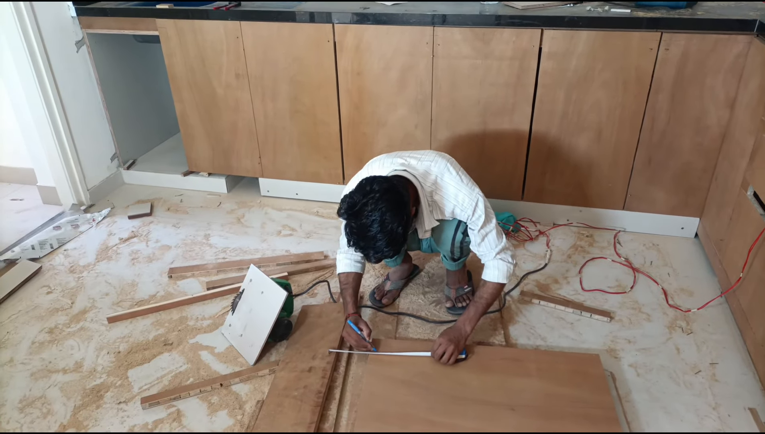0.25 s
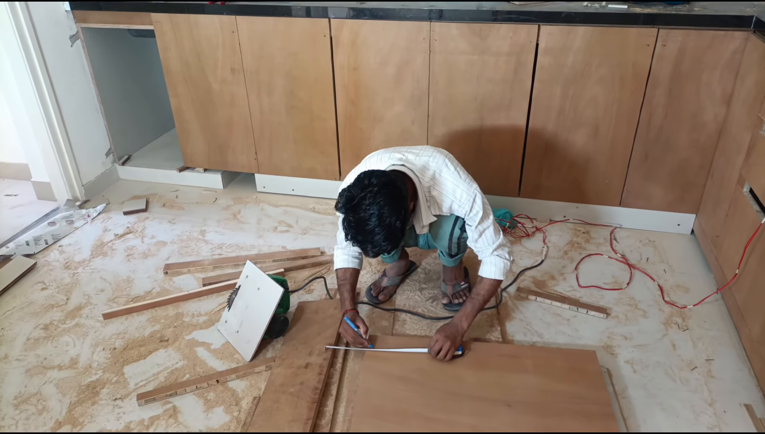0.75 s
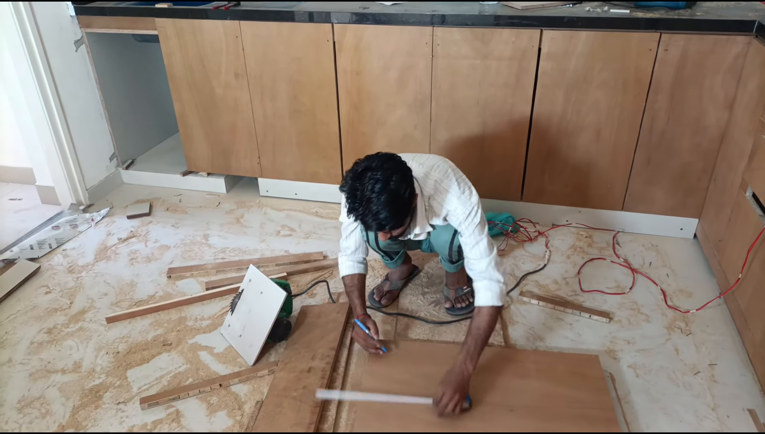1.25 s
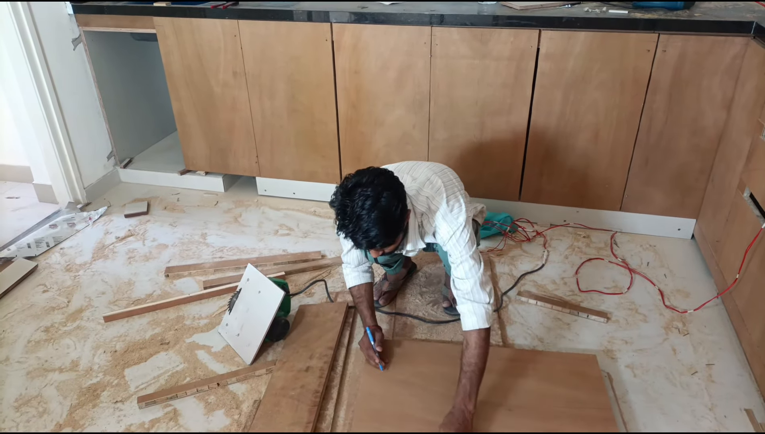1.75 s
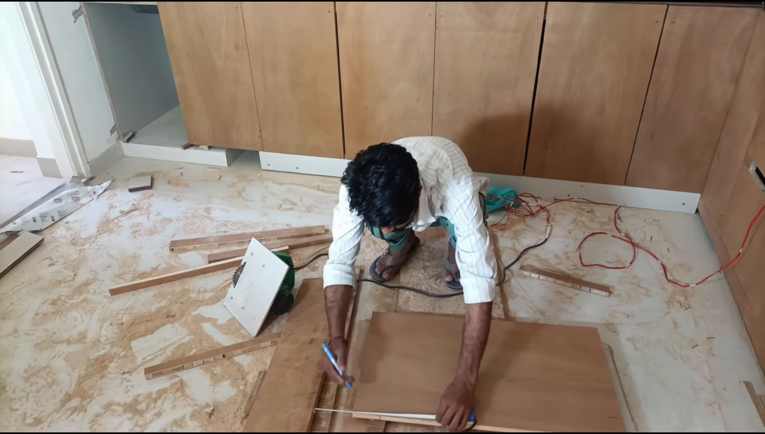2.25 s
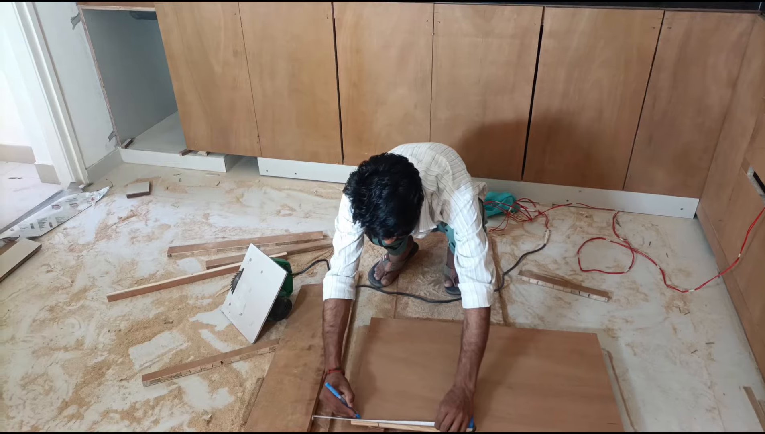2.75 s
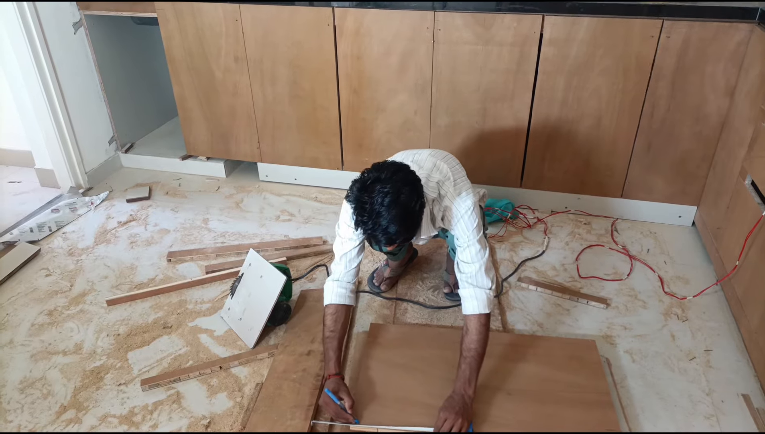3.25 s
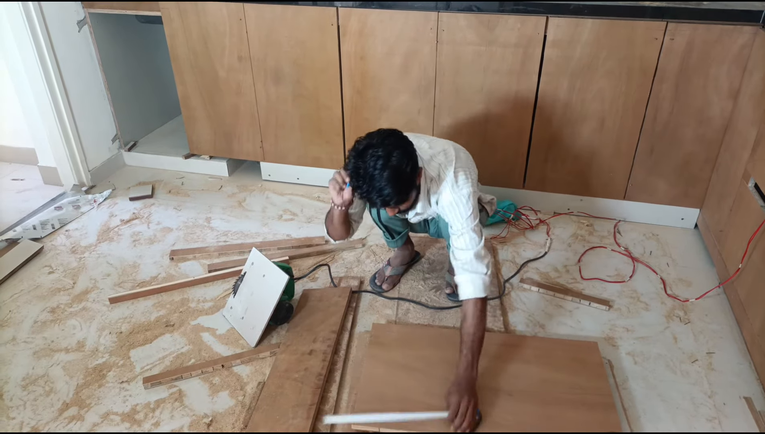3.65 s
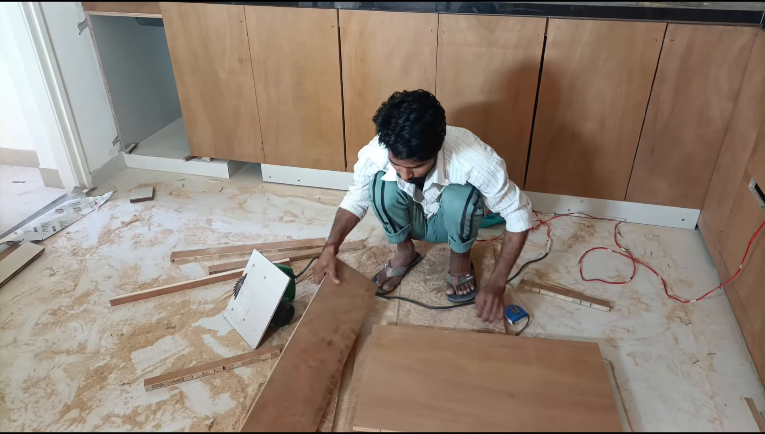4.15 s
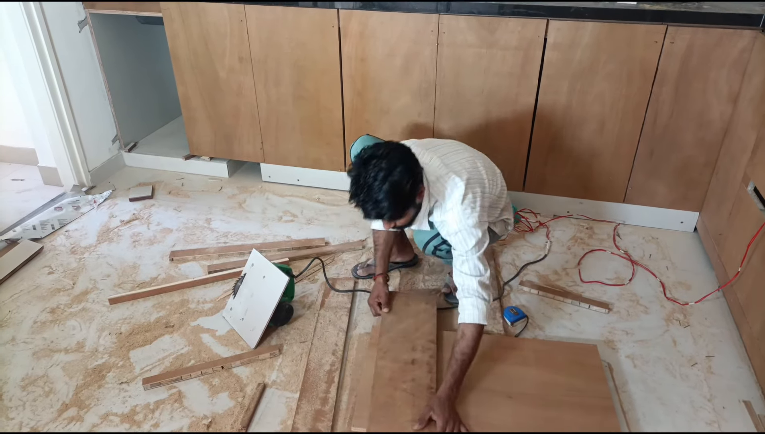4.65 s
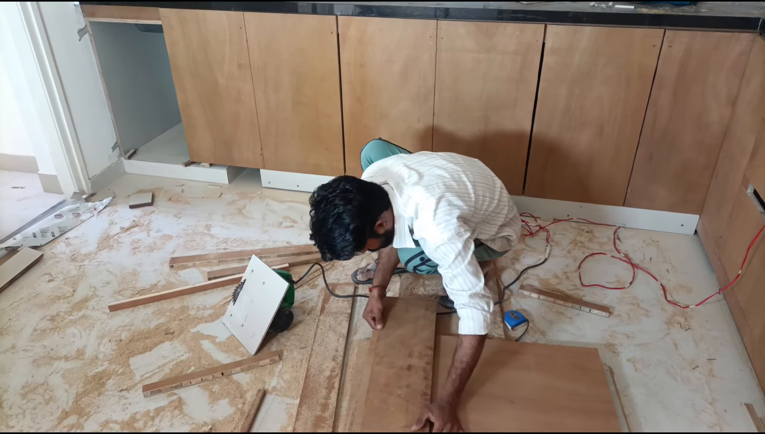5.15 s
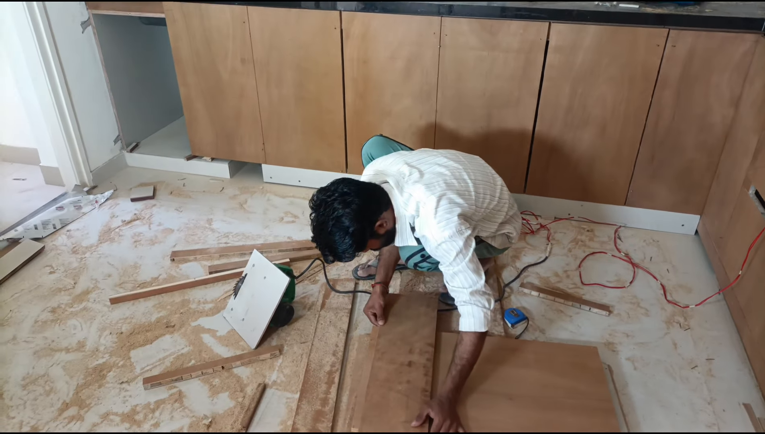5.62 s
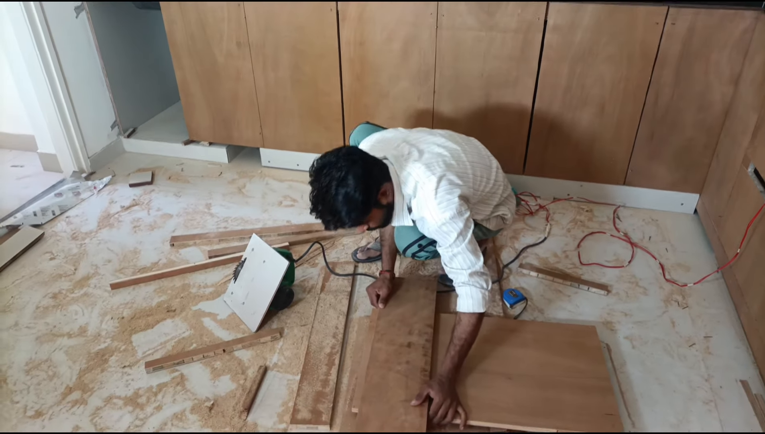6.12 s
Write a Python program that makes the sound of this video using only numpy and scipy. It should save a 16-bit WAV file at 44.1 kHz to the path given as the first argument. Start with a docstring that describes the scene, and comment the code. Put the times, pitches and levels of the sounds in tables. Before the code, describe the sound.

Quiet room air and a far tool's thin hissing whine sit beneath close carpentry sounds. Small metallic ticks lead to a bright tape-blade slap on board, then a near-quiet pause with faint pen scratches. The tape snaps home with a grainy zip, its case clacks down, and a tipped plank slaps and rattles flat, the loudest event. Dull hand knocks follow in the reverberant kitchen, heard in stereo.

```python
"""Steel tape ticks, slides and slaps on plywood in a bare, echoing kitchen, over a power tool's far, faint whine.
A carpenter is marking the sheet; the tape runs back into its case, which he sets down, and a tipped plank
clatters flat. Blows are flurries of tiny impacts filtered by each object's spectrum, plus decaying ringing modes.
Tape slides, plank scrapes and pen strokes are clumped grains of noise that follow the speed of the movement.
The far tool is hiss with wandering whistles; weight shifts and the still air of the room are shaped noise."""
import sys
import numpy as np
from scipy import signal
from scipy.fft import rfft, irfft, next_fast_len
from scipy.io import wavfile
from scipy.ndimage import uniform_filter1d

SR = 44100
rng = np.random.default_rng(int(sys.argv[2]) if len(sys.argv) > 2 else 0)


def int16_out(signal):
    """Quantize to a 16-bit WAV file."""
    q = np.round(np.clip(np.atleast_2d(signal).T, -1, 1) * 32767)
    wavfile.write(sys.argv[1], SR, q.astype(np.int16))


N = 281354  # samples

MIC_GAP = 0.13  # m
SOUND_SPEED = 343  # m/s

# modes of the tape case: f/Hz, level/dB, t60/s
CASE_MODES = [(527.6, -1, 0.33), (2197, -1.5, .3), (2310, -0.5, .3), (2650, -5.5, 0.1916)]
# modes of the plank: f/Hz, level/dB, t60/s
PLANK_MODES = [(286, -30, .4), (346, 6, 0.76), (390.7, -6, 0.76), (405, 7, 0.24), (492, 2, 0.61),
               (807, -5.5, 0.73), (1008, -7.5, 0.74), (1013, -10, .3), (1240, -12.5, 0.46),
               (1140, -18, .35)]
# spectrum of a slide or scrape on the sheet and floor: f/Hz, level/dB
SLIDE_SPECTRUM = [(100, -19.5), (280, -21.5), (440, 0), (700, -18), (1150, -4), (1800, -4.5), (2450, 3.5),
                  (3300, -1.5), (4700, -2.5), (6400, 3.5), (8000, -8.5), (11000, -3.5), (15000, -7)]
# spectrum of the blade rushing into its case: f/Hz, level/dB
SNAP_SPECTRUM = [(100, -26), (500, -25.5), (700, -23.5), (1200, -19.5), (1850, -18), (2350, 4),
                 (3100, -1.5), (4000, -8), (6300, -6.5), (8000, -15.5), (11000, -10.5), (15000, -12)]


def amp(db):
    """Decibels to gain."""
    return 10 ** (np.asarray(db) / 20)


def unit(x):
    """Scales to rms 1."""
    return x / np.sqrt(np.mean(x ** 2) + 1e-20)


def read(points, hz):
    """Reads a table on a log-frequency axis."""
    f, value = np.transpose(points)
    return np.interp(np.log(hz + 1), np.log(f + 1), value)


def add(mix, s, sound):
    """Lays a stereo sound into the mix at time s."""
    start = max(round(s * SR), 0)
    part = mix[:, start:][:, :sound.shape[1]]
    part += sound[:, :part.shape[1]]


def shelves(hz, bass_db, treble_db):
    """Soft contacts give more bass, hard steel edges more treble: dB at each frequency."""
    bass = bass_db / (1 + (hz / 1200) ** 3)
    treble = treble_db * (1 - 1 / (1 + (hz / 4500) ** 4))
    return bass + treble


def colour(x, spectrum, bass_db=0, treble_db=0, size=2048):
    """Causal filter of unit energy with the given spectrum."""
    hz = abs(np.fft.fftfreq(size, 1 / SR))
    log_gain = np.log(amp(read(spectrum, hz) + shelves(hz, bass_db, treble_db)))
    minimum_phase = np.exp(np.conj(signal.hilbert(log_gain)))
    taps = np.fft.ifft(minimum_phase).real
    return signal.fftconvolve(x, taps / np.linalg.norm(taps))


def diffuse(count):
    """Noise from all directions at two microphones: alike in the bass, unrelated in the treble."""
    size = next_fast_len(count)
    a, b = rfft(rng.standard_normal((2, size)))
    same = np.sinc(2 * np.fft.rfftfreq(size, 1 / SR) * MIC_GAP / SOUND_SPEED) * 0.94
    return irfft([a, same * a + np.sqrt(1 - same ** 2) * b], size)[:, :count]


def shape(x, gain_db):
    """Filters both channels by a function that gives dB at each frequency."""
    size = next_fast_len(x.shape[1] + 2048)
    gain = amp(gain_db(np.fft.rfftfreq(size, 1 / SR)))
    return irfft(rfft(x, size) * gain, size)[:, :x.shape[1]]


def room(x, wet_db, early_db=-4, early_s=0.024, build_s=0.00076, count=36000):
    """Direct sound, first bounces off floor and cabinets, and the tail of hard walls, drawn anew each call."""
    # decay of the kitchen: f/Hz, t60/s
    decay = [(100, 0.6), (400, 0.61), (1000, .58), (2500, 0.46), (6000, 0.49), (10000, 0.35), (15000, 0.33)]
    hz, t, z = signal.stft(diffuse(count), SR, nperseg=256)
    z = z * 10 ** (-3 * t / read(decay, hz)[:, None])
    tail = signal.istft(z * (1 - np.exp(-t / build_s)), SR)[1]
    response = amp(wet_db) * tail / np.linalg.norm(tail[0])
    response[:, 0] += 1  # direct sound
    delays_s = np.geomspace(0.001, early_s, 8) * rng.uniform(0.8, 1.2, 8)
    lags_s = MIC_GAP / SOUND_SPEED * rng.uniform(-0.5, 0.5, len(delays_s))
    signs = rng.choice([-1, 1], len(delays_s))
    for delay_s, lag_s, sign in zip(delays_s, lags_s, signs):
        at = np.round((delay_s + np.array([lag_s, -lag_s])) * SR).astype(int)
        response[[0, 1], at] += sign * amp(early_db) / np.sqrt(len(delays_s))
    return signal.fftconvolve(x[None], response, axes=1)


def chatter(length_s, size=4096):
    """A contact of unit energy: a flurry of tiny impacts that swells and dies, with an even spectrum."""
    u = np.arange(size) / SR / max(length_s, 0.0014)  # no contact is shorter than 1.4 ms
    fade = u * np.exp(-u)
    z = rfft(rng.standard_normal(size) * fade)
    force = irfft(z / (abs(z) + 1e-9)) * np.sqrt(fade)
    return force / np.linalg.norm(force)


def resonant(spectrum, modes, peak_db, width_hz):
    """Raises a spectrum at each mode, so that the crack itself rings for a few milliseconds."""
    hz = np.fft.rfftfreq(2048, 1 / SR)
    nearness = 1 / (1 + ((hz - np.array(modes)[:, :1]) / width_hz) ** 2)
    return np.column_stack([hz, read(spectrum, hz) + peak_db * nearness.max(0)])


def contacts(hits, contact_s, bass_db, soft_bass, thinning, doubling_db=30):
    """Gentler blows last longer and carry more bass; brightness takes bass away by the share thinning."""
    s, db, bright_db = np.transpose(hits)
    softer_db = db.max() - db
    length_s = contact_s * 2 ** (softer_db / doubling_db)
    bass = bass_db + soft_bass * softer_db - thinning * bright_db  # negative thinning adds bass
    return np.column_stack([s, db, length_s, bass, bright_db])


def blows(hits, spectrum, modes, ring_db, wet_db):
    """Each blow cracks into the room and leaves the object's modes ringing."""
    out, t = np.zeros((2, N)), np.arange(SR) / SR
    hz, mode_db, t60 = np.transpose(modes)[:, :, None]
    lag_s = MIC_GAP / SOUND_SPEED * rng.uniform(-1, 1, hz.shape)
    fade = 10 ** (-3 * t / t60) * (1 - np.exp(-t / 0.002))
    # each mode arrives from its own side
    rings = fade * np.sin(2 * np.pi * hz * np.array([t + 0 * lag_s, t + lag_s]))
    for s, db, length_s, bass_db, treble_db in hits:
        crack = colour(chatter(length_s), spectrum, bass_db, treble_db)
        crack = crack * np.sqrt(0.005 * SR)  # the energy of rms 1 held for 5 ms
        add(out, s, amp(db) * room(crack, wet_db))
        tilt_db = shelves(hz, bass_db, treble_db) - max(bass_db, treble_db, 0)
        strength = amp(db + ring_db + mode_db + tilt_db)
        add(out, s, strength[:, 0] @ rings)
    return out


def swell(rise_s, fall_s):
    """Speed of one stroke: up, then down to rest."""
    t = np.arange(0, rise_s + fall_s, 1 / SR)
    return np.interp(t, [0, rise_s, rise_s + fall_s], [0, 1, 0])


def pushes(strokes, rise_share, bass_db, thinning):
    """Each push gathers speed for a share of its length and then slows; bright ones carry less bass."""
    rise = np.clip(rise_share, 0.02, 0.9)
    return [(s, rise * length_s, (1 - rise) * length_s, db, bass_db - thinning * bright_db, bright_db)
            for s, length_s, db, bright_db in strokes]


def rubs(strokes, spectrum, grain_db, wet_db, grains_per_s=7000, lumps_db=3, size=300):
    """Sliding contact: countless tiny catches that come in clumps and follow the speed of the stroke."""
    out = np.zeros((2, N))
    catches = rng.standard_normal(N) * (rng.random(N) < grains_per_s / SR)
    pressure_db = lumps_db * np.clip(unit(uniform_filter1d(rng.standard_normal(N), size)), -2, 2)
    spread_db = grain_db * np.minimum(rng.exponential(1, N), 4)
    catches = unit(catches * amp(pressure_db + spread_db))
    for s, rise_s, fall_s, db, bass_db, treble_db in strokes:
        speed = swell(rise_s, fall_s)
        drive = speed * catches[max(round(s * SR), 0):][:len(speed)]
        add(out, s, amp(db) * room(colour(drive, spectrum, bass_db, treble_db), wet_db))
    return out


def air():
    """Low rumble of the building under a thin hiss."""
    # still air of the room: f/Hz, level/dB
    air_spectrum = [(12, -41), (20, -3.5), (64, -3.5), (140, -8), (196, -10.5), (225, -12.5), (465, -18.5),
                    (597, -27.5), (958, -23.5), (1450, -29), (2610, -27.5), (7310, -48), (11100, -32.5),
                    (15500, -37)]
    return amp(-65) * unit(shape(diffuse(N), lambda hz: read(air_spectrum, hz)))


def far_load(t, idle_db=-74.5, bite_s=0.15, release_s=0.14):
    """Gain of the distant tool: it rises as a cut bites, holds, and falls back to idling."""
    # cuts of the tool: t/s, length/s, level/dB
    cuts = [(0.06, 0.18, -60.5), (1.7, .68, -70.5), (3.31, 3.08, -62)]
    gain = amp(idle_db)
    for s, length_s, db in cuts:
        bite = np.clip((t - s) / bite_s, 0, 1)
        release = np.exp(-np.maximum(t - s - length_s, 0) / release_s)
        gain = np.hypot(gain, amp(db) * bite * release)
    return gain


def far_tool(size=5000):
    """A cutter several rooms away: hiss and a few fuzzy whistles that wander, flare up and follow its load."""
    # spectrum of the hiss: f/Hz, level/dB
    hiss = [(300, -1), (1000, -9.5), (1600, -8), (2550, 2), (3300, -3.5), (4600, -5.5), (6300, -6.5),
            (7500, -19.5), (15000, -31)]
    # whistles: f/Hz, width/Hz, level against the hiss/dB, rms wander/share of pitch
    whistles = [(2465, 80, -10.5, 0.017), (3870, 81, -9.5, 0.0044), (4590, 62, -12, .02),
                (6100, 120, -13.5, 0.035)]
    sound = unit(shape(diffuse(N), lambda hz: read(hiss, hz)))
    for hz, width_hz, db, wander in whistles:
        drift, flare = (unit(uniform_filter1d(row, size)) for row in rng.standard_normal((2, N)))
        r = np.exp(-np.pi * abs(width_hz) / SR)
        # slow noise on the tone makes the whistle fuzzy
        flutter = signal.lfilter([1], [1, -2 * r, r * r], rng.standard_normal((2, N)))
        tone = np.sin(2 * np.pi * hz * np.cumsum(1 + wander * drift) / SR)
        sound += amp(db) * unit(amp(3 * flare) * flutter * tone)
    return sound * far_load(np.arange(N) / SR)


def shifts(width=0.55):
    """Weight moving on the boards gives low, soft bumps of band-shaped noise."""
    # dull shifts of weight: t/s, rise/s, fall/s, level/dB, centre f/Hz
    bumps = [(1.308, 0.06, 0.11, -55.5, 163), (3.539, 0.082, 0.054, -58, 104),
             (4.545, 0.014, 0.11, -50.5, 247), (5.53, 0.053, 0.21, -52.5, 248),
             (5.671, 0.08, 0.13, -54.5, 61)]
    out, noise = np.zeros((2, N)), diffuse(SR)
    for s, rise_s, fall_s, db, centre_hz in bumps:
        push = swell(rise_s, fall_s)
        rumble = shape(noise, lambda hz: -20 * np.log10(1 + (np.log((hz + 1) / centre_hz) / width) ** 4))
        add(out, s, amp(db) * push * unit(rumble[:, :len(push)]))
    return out


def pen():
    """The pen drags along the wood in fine catches, and its tip squeaks on a short line."""
    # strokes along the wood: t/s, rise/s, fall/s, level/dB, bass/dB, treble/dB
    strokes = [(.05, 0.16, 0.23, -67, 9, -5), (2.19, 0.017, 0.24, -76, -27, 28)]
    # spectrum of a stroke: f/Hz, level/dB
    stroke_spectrum = [(150, 0), (380, 3), (540, 11), (750, 1), (1500, -1), (2600, -41.5), (3800, -24.5),
                       (5500, -20.5), (7500, -72), (15000, -89)]
    # squeaks of the tip: t/s, rise/s, fall/s, level/dB, bass/dB, treble/dB
    squeaks = [(3.0, 0.033, 0.12, -71, 3, 3), (3.06, 0.04, 0.074, -74, 2.5, -19)]
    # spectrum of a squeak: f/Hz, level/dB
    squeak_spectrum = [(100, -30), (3000, -15.5), (3550, 5), (3850, -6), (4150, 2), (4700, -22), (5300, -2),
                       (6200, -19), (15000, -47)]
    drawn = rubs(strokes, stroke_spectrum, grain_db=-16, wet_db=3.5)
    return drawn + rubs(squeaks, squeak_spectrum, grain_db=5, wet_db=6)


def wood_knocks():
    """Hands knock softly on the wood: long, dull contacts that faintly ring the plank modes."""
    # knocks: t/s, level/dB, brightness/dB
    hits = [(1.232, -48.5, -8), (3.455, -52.5, 0), (3.812, -45.5, 5), (3.975, -46, -6.5), (5.895, -46.5, 0),
            (5.920, -45, -6)]
    # spectrum of the knock: f/Hz, level/dB
    spectrum = [(100, -11), (350, -13), (480, 7.5), (680, -19), (1100, -10), (2000, -24), (8000, -46.5)]
    knocks = contacts(hits, contact_s=0.0086, bass_db=-3.5, soft_bass=0.075, thinning=0.6)
    return blows(knocks, spectrum, PLANK_MODES, ring_db=-27, wet_db=-3)


def plank_scrapes():
    """The plank scrapes on the floor in grainy catches as it is tipped over and nudged."""
    # scrapes: t/s, length/s, level/dB, brightness/dB
    strokes = [(4.36, .14, -48, -15.5), (4.52, 0.15, -47, -10.5), (4.79, 0.13, -56, -7)]
    scrapes = pushes(strokes, rise_share=0.21, bass_db=-8.5, thinning=0.044)
    return rubs(scrapes, SLIDE_SPECTRUM, grain_db=4, wet_db=2)


def settling(hits, gap_s=0.047, shrink=0.92, first_db=-30, loss_db=3, contact_s=0.0024,
             bass_db=0, treble_db=-6, count=4):
    """After its last big blow the plank rocks to rest, each bounce sooner and weaker."""
    k = np.arange(count)
    times = hits[-1][0] + np.cumsum(gap_s * shrink ** k)
    bounces = [(s, first_db - loss_db * i, contact_s, bass_db, treble_db) for i, s in zip(k, times)]
    return list(hits) + bounces


def plank_fall():
    """The plank lands edge first, slaps flat, bounces and rocks to rest, ringing its wooden modes."""
    # main blows: t/s, level/dB, chatter/s, bass/dB, treble/dB
    hits = [(4.606, -11.5, 0.0032, 7.5, -8), (4.616, -15, 0.0035, -8.5, 7.5),
            (4.626, -12.5, 0.0029, 6.5, 10), (4.652, -17, 0.0064, 14, 2), (4.680, -14.5, 0.0016, 3, -1),
            (4.691, -12.5, 0.0011, -3, -8.5), (4.699, -19, 0.0012, -1.5, -4)]
    # spectrum of the first crack: f/Hz, level/dB
    spectrum = [(60, -26), (200, -21), (290, -15.5), (360, -1), (480, 0), (650, -16.5), (1050, -6),
                (1500, -12.5), (2450, -7.5), (3500, -22), (6000, -33.5), (8000, -50), (15000, -60)]
    board = resonant(spectrum, PLANK_MODES, peak_db=0.5, width_hz=22)
    return blows(settling(hits), board, PLANK_MODES, ring_db=-16.5, wet_db=1.16)


def case_clacks():
    """The tape case clacks down on the floor in a quick run of blows that leave its modes ringing."""
    # clacks: t/s, level/dB, brightness/dB
    hits = [(4.107, -25.5, -11.5), (4.118, -28, -2), (4.147, -23.5, -4), (4.159, -13, -5), (4.181, -33, -1)]
    # spectrum of the first crack: f/Hz, level/dB
    spectrum = [(100, -32), (280, -28), (500, -9.5), (700, -16), (1100, -9.5), (1800, -13), (2450, 1.5),
                (3300, -8), (4500, -15), (6400, -15), (8000, -22.5), (14000, -21.5)]
    case = resonant(spectrum, CASE_MODES, peak_db=1, width_hz=60)
    clacks = contacts(hits, contact_s=0.0024, bass_db=-5.5, soft_bass=0.9, thinning=0.45)
    return blows(clacks, case, CASE_MODES, ring_db=-9.5, wet_db=4)


def tape_return():
    """The spring reels the blade in with a grainy zip, and it whips into the case until the hook stops it."""
    # snaps in the case: t/s, level/dB, brightness/dB
    hits = [(3.664, -41, 0), (3.682, -33, 22), (3.796, -38.5, 8), (3.926, -25.5, 7.5), (4.039, -21.5, -3.5)]
    # zip of the blade: t/s, rise/s, fall/s, level/dB, bass/dB, treble/dB
    zips = [(3.906, 0.021, 0.051, -29, -10, 8)]
    snaps = contacts(hits, contact_s=0.0021, bass_db=-2.5, soft_bass=0.46, thinning=0.15)
    snapping = blows(snaps, SNAP_SPECTRUM, CASE_MODES, ring_db=-28.5, wet_db=5)
    return snapping + rubs(zips, SNAP_SPECTRUM, grain_db=-2.5, wet_db=2.5)


def tape_slides():
    """The steel tape slides over the sheet and into its case in a rush of tiny catches."""
    # slides: t/s, length/s, level/dB, brightness/dB
    strokes = [(1.175, 0.087, -47.5, 5.5), (1.22, 0.079, -48, -12), (1.385, 0.18, -53.5, -11.5),
               (1.60, 0.076, -41, -2), (3.54, 0.35, -61, -9.5), (3.68, 0.2, -47, -10.5),
               (3.85, 0.21, -44, 11.5)]
    slides = pushes(strokes, rise_share=0.18, bass_db=4, thinning=0.15)
    return rubs(slides, SLIDE_SPECTRUM, grain_db=1.5, wet_db=2)


def tape_ticks():
    """Case and hook tick on the sheet: short contacts that leave modes ringing."""
    # ticks: t/s, level/dB, brightness/dB
    hits = [(.839, -47, -8.5), (.897, -52, -15), (.943, -37.5, -17.5), (.950, -40.5, 7.5),
            (1.029, -53.5, -2), (1.040, -36, 5.5), (1.085, -48.5, -4.5), (2.198, -54, 17)]
    # spectrum of the first crack: f/Hz, level/dB
    spectrum = [(100, -17), (300, -16), (490, -1.5), (680, -19), (1150, -7), (1450, -15.5), (1830, -5.5),
                (2100, -4), (2420, 1.5), (3200, -10.5), (4300, -24), (6600, -9), (7600, -23.5),
                (15000, -25)]
    # ringing after a tick: f/Hz, level/dB, t60/s
    modes = [(484, -1, 1), (1770, 0, 0.45), (2430, 13, 0.17), (2690, -46, .25), (5940, -10, .35),
             (6870, -8.5, 0.33)]
    tick = resonant(spectrum, modes, peak_db=8, width_hz=90)
    ticks = contacts(hits, contact_s=0.0022, bass_db=-4.5, soft_bass=0.41, thinning=-0.1)
    return blows(ticks, tick, modes, ring_db=-20.5, wet_db=-1)


def blade_slaps():
    """The steel blade strikes the sheet: very short contacts that set its modes ringing."""
    # slaps: t/s, level/dB, brightness/dB
    hits = [(1.339, -44, 25), (1.429, -18, 1.5), (1.449, -27.5, -8.5), (1.600, -32, 25), (3.280, -64, -18),
            (3.373, -57.5, -18), (3.428, -55, -3), (3.453, -50.5, -8)]
    # spectrum of the first crack: f/Hz, level/dB
    spectrum = [(100, -25.5), (230, -28.5), (400, -12), (520, -18), (680, -24.5), (1130, -8), (1450, -16.5),
                (1780, -7.5), (2050, -8.5), (2420, -0.5), (3200, -10.5), (4500, -15), (6400, -20),
                (8000, -29), (15000, -24.5)]
    # ringing after a slap: f/Hz, level/dB, t60/s
    modes = [(420, -8, .3), (1130, 0, .35), (1766, -2, .35), (2400, -3, .28), (2810, -7, .21),
             (3278, -10, .25), (5879, -21, .3)]
    blade = resonant(spectrum, modes, peak_db=7, width_hz=80)
    slaps = contacts(hits, contact_s=0.0013, bass_db=1, soft_bass=0.065, thinning=0.55)
    return blows(slaps, blade, modes, ring_db=-9.5, wet_db=3.5)


def scene():
    """Tape, plank and pen over the sounds of the building."""
    building = air() + far_tool() + shifts()
    plank = wood_knocks() + plank_scrapes() + plank_fall()
    tape = case_clacks() + tape_return() + tape_slides() + tape_ticks() + blade_slaps()
    return building + pen() + plank + tape


def record(dry):
    """Each channel has its own tone; the loudest peaks are rounded off; then the band limit."""
    # tone of the left channel: f/Hz, gain/dB
    left_tone = [(1400, 1), (1900, 3.5), (2450, 2), (3200, 2), (4200, 2.5), (5200, 3.5), (6600, 6),
                 (7800, -1), (9500, -0.5), (12000, 1), (14000, 5)]
    # tone of the right channel, duller at the top: f/Hz, gain/dB
    right_tone = [(1400, 1), (1900, 0), (2450, -6), (3200, -8), (4200, -3.5), (5200, -6.5), (6600, -11.5),
                  (7800, 1), (9500, 1), (12000, -1.5), (13300, -11.5), (15500, -21)]
    edge_hz = 15800
    heard = shape(dry, lambda hz: np.array([read(left_tone, hz), read(right_tone, hz)]))
    rounded = heard / (1 + (heard / 0.85) ** 6) ** (1 / 6)
    low_pass = signal.firwin(511, edge_hz, window=("kaiser", 9), fs=SR)
    return signal.oaconvolve(rounded, low_pass[None], "same")


dry = scene()
out = record(dry)
int16_out(out)
```